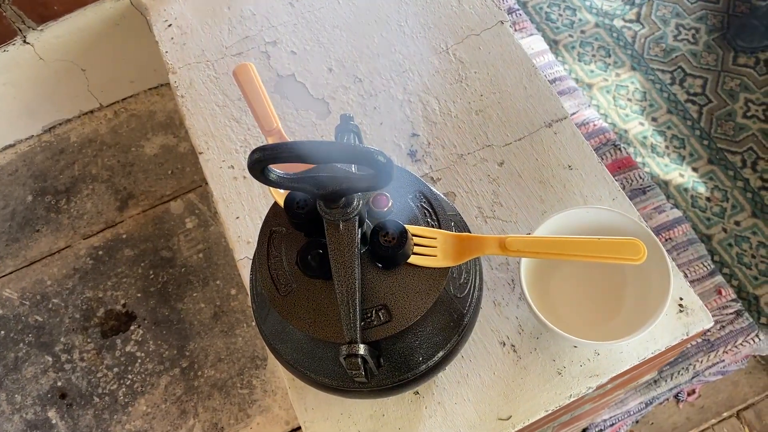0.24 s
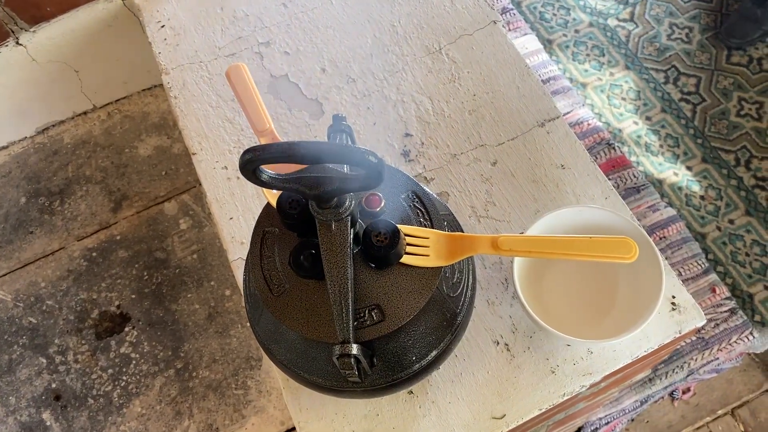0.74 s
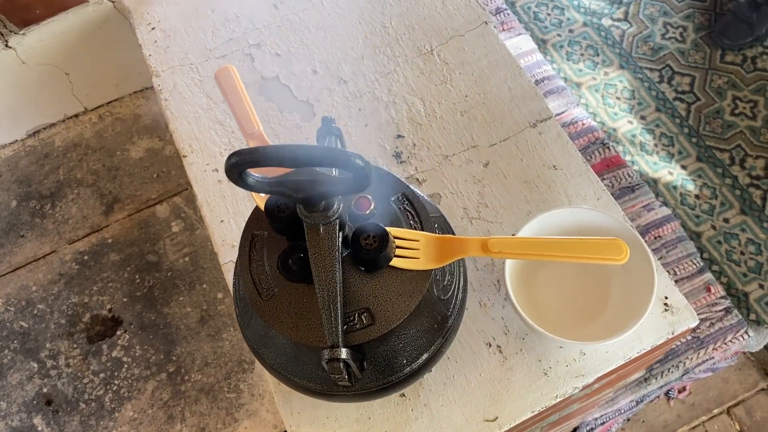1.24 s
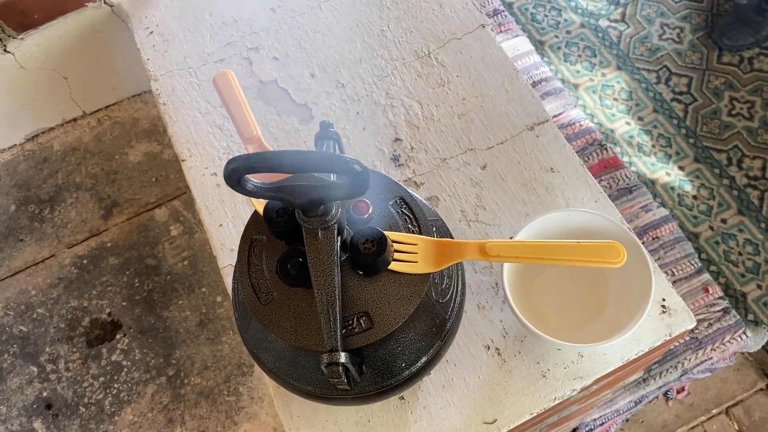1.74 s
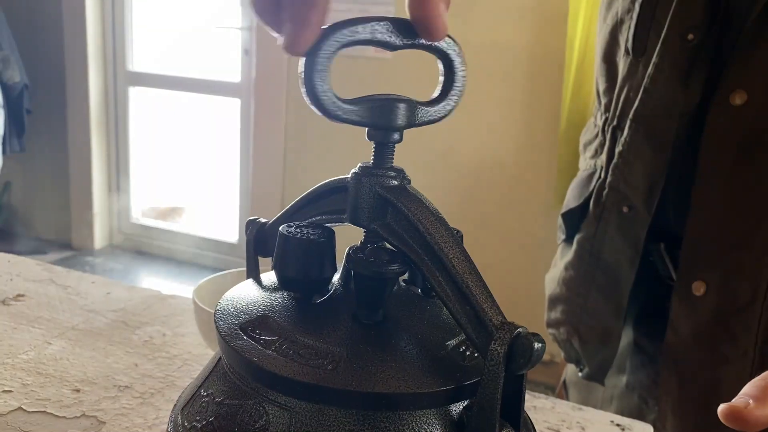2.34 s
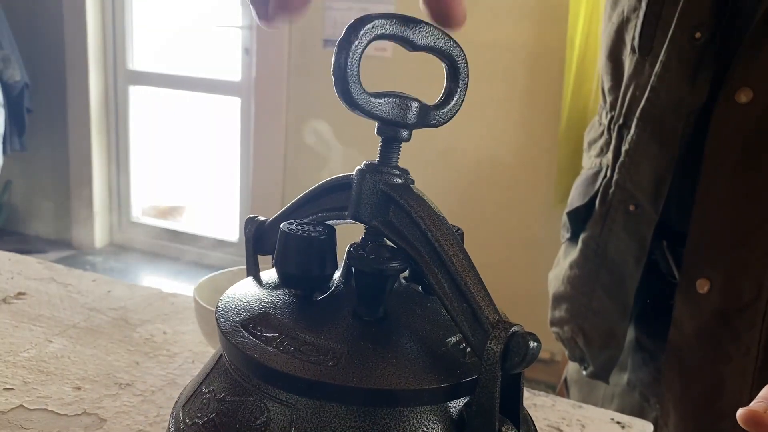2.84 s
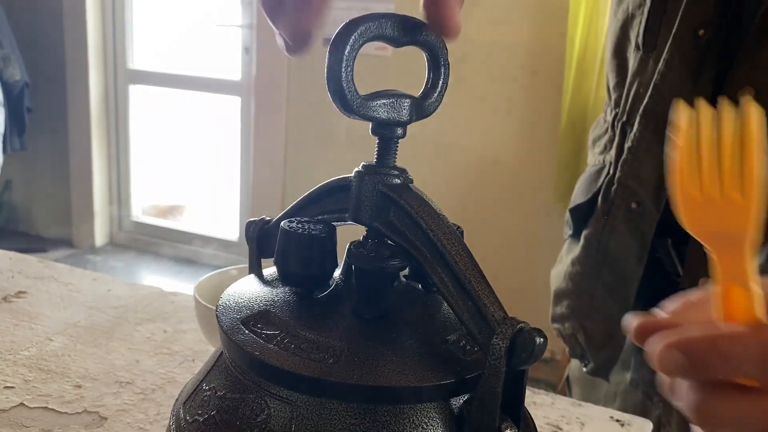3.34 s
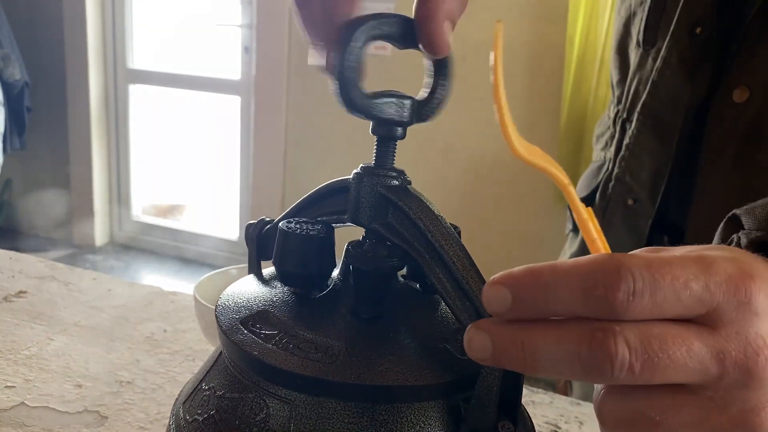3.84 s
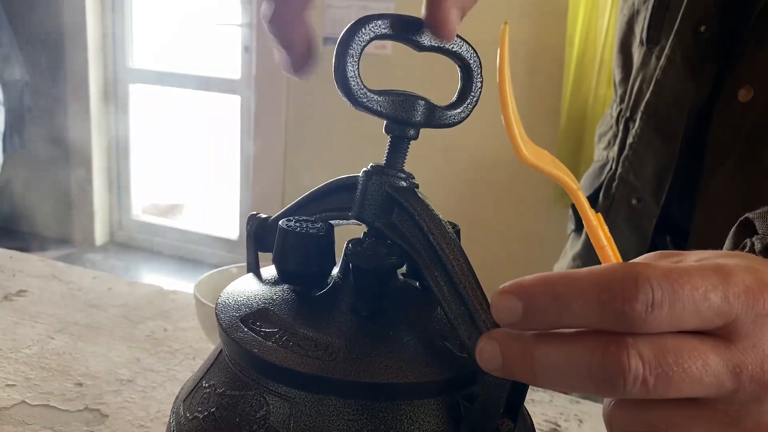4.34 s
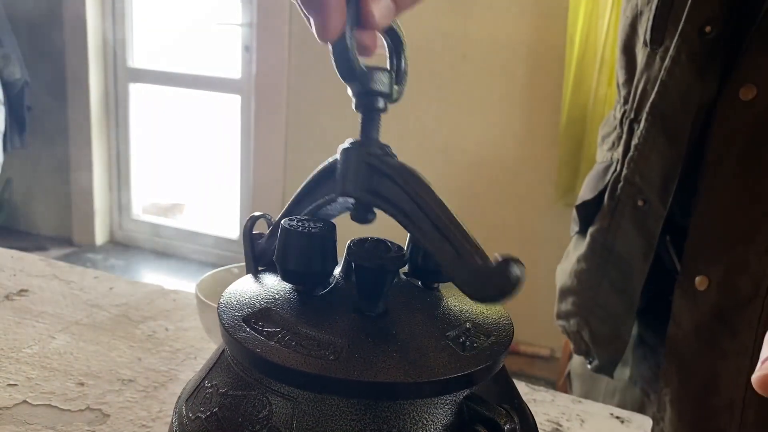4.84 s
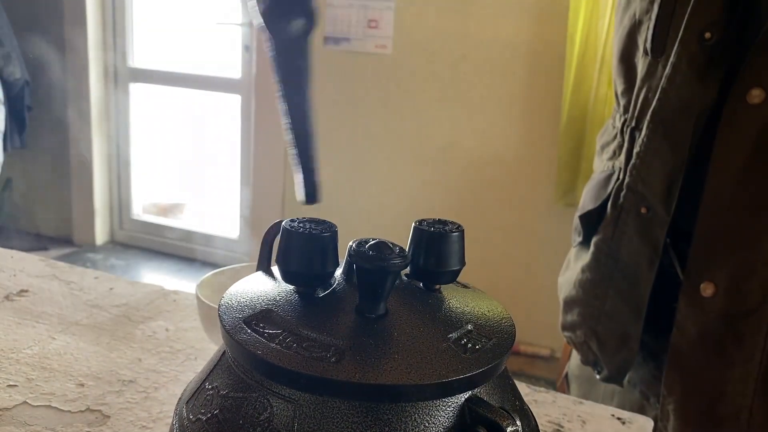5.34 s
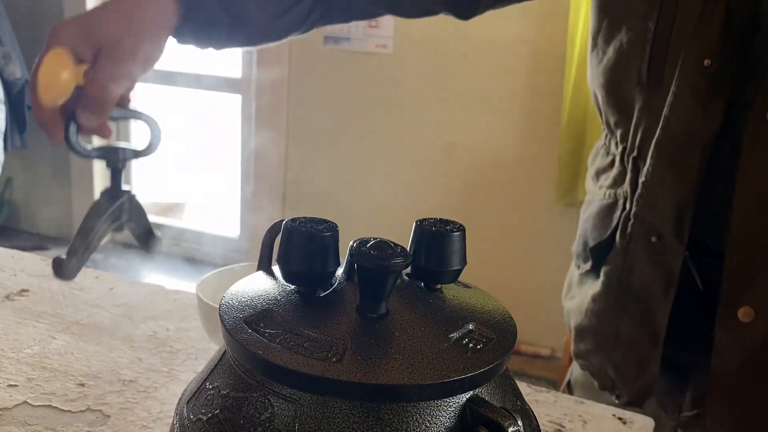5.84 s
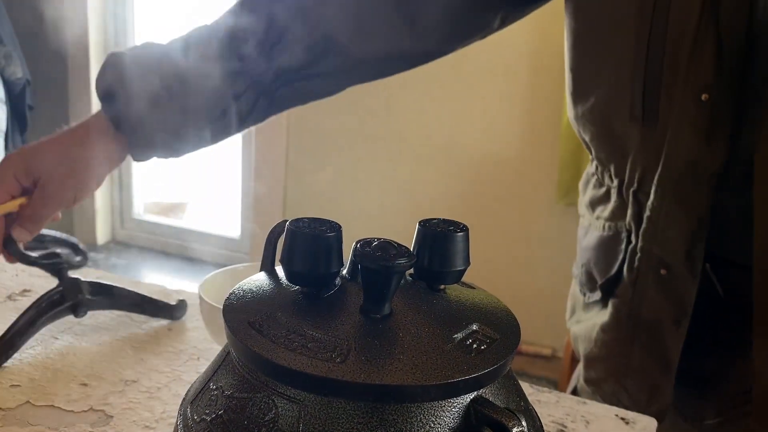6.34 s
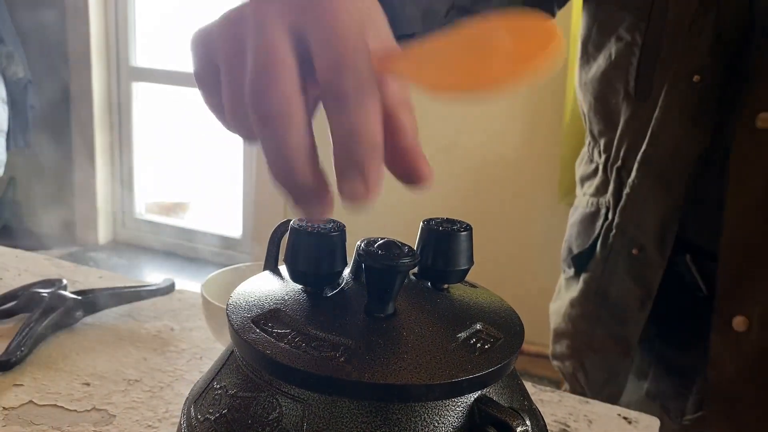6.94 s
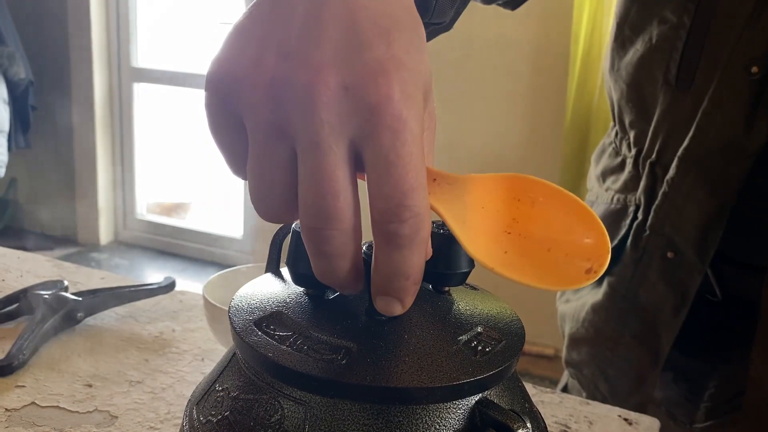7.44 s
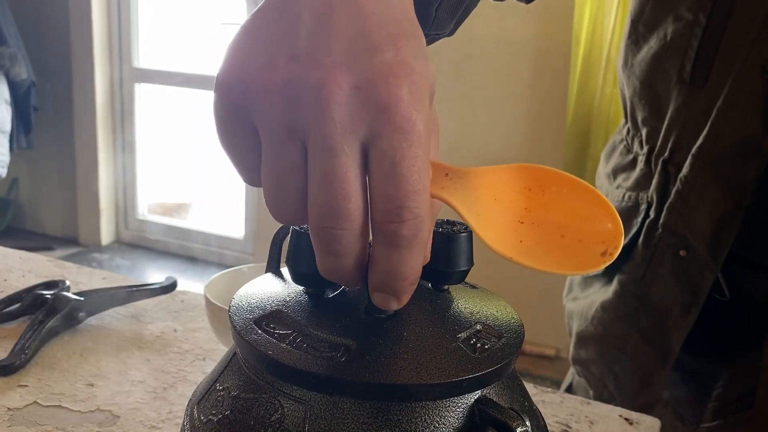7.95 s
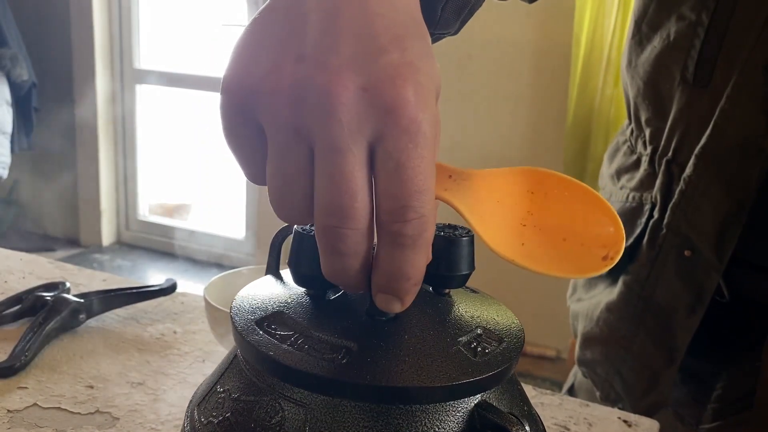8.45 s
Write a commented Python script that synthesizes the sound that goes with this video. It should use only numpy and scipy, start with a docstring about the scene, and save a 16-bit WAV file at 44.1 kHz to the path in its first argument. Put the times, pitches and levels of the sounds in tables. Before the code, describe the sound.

Full-force pressure-cooker hiss, piercing and nearly constant, is chopped off after about two seconds. Soft fading fizz remains, with irregular dull taps, small scrapes and short iron clinks from loosening the cast clamp. The strongest clank comes mid-way, followed by a gentle puff of steam and knocks on the table. A brief spurt and thin squeak from the valve ends it. Small wooden room, close phone microphones, slightly left-heavy metal.

```python
"""A loud, steady steam jet hisses from the propped valve of a cast pressure cooker in a cabin kitchen, then
is cut short. The last steam seeps away as shaped noise on a sinking pressure over a rumbling stove, while the
screw handle is spun loose and the clamp knocks free and is laid on the table: ringing modes, struck, scraped
or rattled. At last a hand presses the valve, which squeaks and whistles. A phone's two microphone ports
listen, the left one hearing the ironwork louder."""
import sys
import numpy as np
from scipy import signal
from scipy.fft import rfft, irfft, next_fast_len
from scipy.io import wavfile
from scipy.ndimage import uniform_filter1d, map_coordinates

SR = 44100
rng = np.random.default_rng(int(sys.argv[2]) if len(sys.argv) > 2 else 0)


def generate_wav(sig):
    """Save sig (samples, or channels by samples) to the path in sys.argv[1] as 16-bit PCM at SR."""
    pcm = np.round(np.clip(np.atleast_2d(sig).T, -1, 1) * 32767).astype(np.int16)
    wavfile.write(sys.argv[1], SR, pcm)


N = 383223
JET_END = 1.9705  # s

# mode of the screw handle: (frequency [Hz], level [dB], decay [share of the contact's t60])
HANDLE_MODES = [(4001, 7, 0.65)]
# modes of the pot, each t60 shortened by the contact: (frequency [Hz], level [dB], full t60 [s])
POT_MODES = [(410, 4, 0.037), (583, 2.5, 0.018), (694, 6, 0.02), (1038, 2, 0.033), (1317, -1, 0.012)]
# modes of the wooden table under the pot: (frequency [Hz], level [dB], full t60 [s])
TABLE_MODES = [(89.8, -6, 0.36), (133.3, -6.5, 0.33), (229.7, -2, 0.072), (600, -14, 0.043)]


def amp(db):
    """Gain of a level in dB."""
    return 10 ** (np.asarray(db) / 20)


def unit(x):
    """x at rms 1."""
    return x / np.sqrt(np.mean(x ** 2) + 1e-20)


def along(points, hz):
    """Every column of (Hz, value, ..) points, read on a log frequency axis."""
    f, *cols = np.transpose(points)
    return np.array([np.interp(np.log(hz + 1), np.log(f + 1), c) for c in cols])


def curves(rows):
    """One value per sample for each column after the time; the end values hold."""
    s, *cols = np.transpose(rows)
    return [np.interp(np.arange(N) / SR, s, c) for c in cols]


def wobble(rate):
    """A smooth random curve, rate knots a second."""
    knots = rng.standard_normal(int(N * rate / SR) + 4)
    return map_coordinates(knots, [np.arange(N) * rate / SR])


def swell(s, length):
    """A smooth rise and fall from s, zero elsewhere."""
    return np.sin(np.pi * np.clip((np.arange(N) / SR - s) / length, 0, 1)) ** 2


def filtered(x, response):
    """x times a complex response of frequency."""
    m = next_fast_len(N + SR // 2)
    return irfft(rfft(x, m) * response(np.fft.rfftfreq(m, 1 / SR)), m)[..., :N]


def ports(pair):
    """Left and right from a shared and an unshared signal; the distance between the ports turns the phase."""
    # likeness of the two microphone ports: (frequency [Hz], correlation [0 to 1])
    alike = [(30, 0.53), (90, 0.94), (250, .75), (500, .5), (1100, 0.39), (3200, 0.59), (5000, 0.11),
             (6200, 0.55), (7000, 1), (8000, 1), (9000, 0.98), (15800, 0.81)]
    # phase by which the left port leads: (frequency [Hz], lead [rad])
    left_lead = [(0, 0), (2400, .4), (3300, 1.3), (4300, .9), (5200, 2.7), (6100, 6), (6900, 2 * np.pi),
                 (15480, -2 * np.pi), (16600, -2 * np.pi)]

    def mix(hz):
        turn = np.arccos(np.clip(along(alike, hz)[0], 0, 1)) / 2
        return np.array([np.cos(turn), np.sin(turn)])

    def lead(hz):
        # half the lead goes to each port, with opposite signs
        return np.exp(.5j * np.outer([1, -1], np.interp(hz, *np.transpose(left_lead))))

    shared, own = filtered(pair, mix)
    return filtered(np.array([shared + own, shared - own]), lead)


def rush(colour, patchy_db):
    """Stereo turbulence of rms 1: coloured noise with patches of random gain in time and frequency."""
    z = signal.stft(rng.standard_normal((2, N)), nperseg=512)[2]
    over_frequency = uniform_filter1d(rng.standard_normal(z.shape[1:]), 6, 0)
    patches = unit(uniform_filter1d(over_frequency, 10, 1))
    pair = signal.istft(z * amp(patchy_db * patches), nperseg=512)[1][:, :N]
    return unit(filtered(ports(pair), lambda hz: amp(along(colour, hz))))


def jet():
    """The full steam jet is broad turbulence that flutters slightly and stops within 0.33 ms."""
    # tone of the jet at each port: (frequency [Hz], left level [dB], right level [dB])
    jet_colour = [(19.8, -60.5, -61.5), (49, -45.5, -47.5), (150, -40.5, -40), (507, -38.5, -42),
                  (1030, -32, -36), (2400, -18, -19.5), (4100, -8, -14.5), (5260, -9.5, -19),
                  (6340, -16.5, -15), (7550, -12.5, -18), (8340, -8, -3), (8570, -13, -16),
                  (10600, -2.5, -2.5), (13900, -1, -1), (17000, -2.5, -2)]
    level_db, extra_hiss_db = -21.5, 1  # level of the jet; extra strength of its hiss under 7.5 kHz
    flow = rush(jet_colour, patchy_db=0.84)
    lower = filtered(flow, lambda hz: 1 / (1 + (hz / 7500) ** 8))
    flow = flow + lower * (amp(extra_hiss_db) - 1)
    on = np.clip((JET_END - np.arange(N) / SR) / 0.00033, 0, 1)
    flutter_db = 0.43 * wobble(12.67) + 0.31 * wobble(150)
    return on * amp(level_db + flutter_db) * flow


def stove():
    """The draught of the stove rumbles in lumps: low noise with a slowly wandering level."""
    # tone of the rumble at each port: (frequency [Hz], left level [dB], right level [dB])
    stove_colour = [(15.26, -48, -37), (30, -17, -27), (45.4, -17, -7), (62.8, 5, -4), (105, -7, -5),
                    (158, -8.5, -17), (215, -26, -24.5), (338, -36, -36.5), (590, -38, -38.5),
                    (3000, -120, -120)]
    level_db, start_s, fade_s = -58, 1.97, 0.32
    fade = np.clip((np.arange(N) / SR - start_s) / fade_s, 0, 1)
    lumps_db = 2.4 * wobble(15) + 2.2 * wobble(9.6) + 0.99 * wobble(2.9)
    rumble = amp(lumps_db) * rush(stove_colour, patchy_db=1.8)
    return fade * amp(level_db) * unit(rumble)


def seep():
    """Dying steam: hiss and fizz at the valve, murmur of the hot liquid in the pot, all on one pressure."""
    # tones at each port: (frequency [Hz], left level [dB], right level [dB])
    hiss_colour = [(1010, -14, -32), (1550, -5, -4.5), (2280, 2.5, -8.5), (3950, 2, -4.5), (4940, 0.5, -4),
                   (5730, 2, 1.5), (7950, -2, -4), (8200, -37, -12), (10600, -22, -29), (15000, -120, -120)]
    fizz_colour = [(6470, -48, -11), (8000, -1, -2.5), (11060, -1, -0.5), (13900, -2, -2.5),
                   (16100, -8, -6)]
    murmur_colour = [(150, 0, -3.5), (338, -2, -8), (535, -3, -10.5), (790, 3, -8.5), (1082, -0.5, -2.5),
                     (1630, 1.5, -18), (2350, -26, -32), (8000, -120, -120)]
    # flow at the valve under the hand, pressed, shut, let go: (time [s], hiss level [dB], fizz level [dB])
    hand = [(7.8, -2.5, -0.5), (8.04, 1.5, 3), (8.07, 2, -3), (8.24, -2, -8), (8.265, -7, -12),
            (8.305, -8, -15.5), (8.335, 11, 2.5), (8.51, 1, -2.5), (8.535, -2, -5)]
    start_db, sink_db_per_s = -55, 2.5
    surge_start_db, surge_s = 17.5, 0.15
    fizz_db, murmur_db = -1, -8  # against the hiss
    lift_s, lift_db, rise_s, fall_s = 4.6, 5.5, 0.19, 0.24  # the freed lid lets out a puff

    t = np.arange(N) / SR
    after = np.maximum(t - JET_END, 0)
    surge_db = surge_start_db * np.exp(-after / surge_s)
    flow_db = start_db - sink_db_per_s * after
    from_lift = np.where(t < lift_s, (lift_s - t) / rise_s, (t - lift_s) / fall_s)
    puff_db = lift_db * np.exp(-from_lift ** 2)
    hiss_hand_db, fizz_hand_db = curves(hand)

    # the lower hiss takes a smaller share of the puff
    hiss_level_db = flow_db + surge_db + 0.77 * puff_db + hiss_hand_db + 0.34 * wobble(3.17)
    fizz_level_db = flow_db + surge_db + puff_db + fizz_hand_db + fizz_db + wobble(2.91)
    murmur_level_db = flow_db + 0.89 * surge_db + murmur_db + 0.75 * wobble(20)
    hiss = amp(hiss_level_db) * rush(hiss_colour, patchy_db=1.5)
    fizz = amp(fizz_level_db) * rush(fizz_colour, patchy_db=1.7)
    murmur = amp(murmur_level_db) * rush(murmur_colour, patchy_db=1.5)
    return hiss + fizz + murmur


def ring(modes, t, scatter_db, free=1, centre_hz=1, narrow_db=0):
    """One blow: every mode at a new strength, weaker away from the centre that the struck spot favours."""
    hz, db, t60 = np.transpose(modes)[:, :, None]
    db = db + scatter_db * rng.standard_normal(db.shape)
    db = db - narrow_db * np.log2(hz / centre_hz) ** 2
    decay_db = 60 * t / (t60 * max(free, .01))
    return (amp(db - decay_db) * np.sin(2 * np.pi * hz * t)).sum(0)


def contacts():
    """Clanks, rattles and taps as rows of the same shares, with levels at the source."""
    # clamp and screw clank: (time [s], clamp level [dB], where it rings most [Hz],
    # narrowness [dB at one octave], handle level [dB], pot level [dB], where the pot rings most [Hz],
    # table level [dB])
    clanks = [(2.006, -42, 6620, 15, -65, -62, 848, -45), (2.393, -37, 4030, 13.5, -50, -55, 960, -49),
              (2.5755, -39, 4150, 10, -54, -49.5, 355, -59), (2.6851, -33, 2920, 6, -52, -41.5, 415, -64),
              (3.124, -41, 4096, 14, -45, -51, 1050, -56), (3.1922, -44.5, 4000, 4, -55, -43, 442, -55),
              (4.035, -45.5, 3500, 5.5, -62, -53, 374, -53),
              (4.0871, -33.5, 3696, 29, -43.5, -50.5, 1050, -52.5),
              (4.209, -41, 2720, 6.5, -74, -50, 1080, -58), (4.3186, -48, 2720, 12, -77, -43.5, 1050, -57),
              (4.5052, -21.5, 1460, 26, -35, -33, 686, -40.5),
              (4.5114, -23, 6360, 11, -68, -40, 425, -41.5), (4.855, -33, 1590, 18, -53, -44.5, 735, -46),
              (5.0982, -43, 1630, 10, -75, -57, 1100, -49), (5.215, -37, 2900, 2, -50, -58, 704, -63),
              (5.228, -34.5, 5360, 16, -64, -56, 1060, -65), (6.097, -33, 4150, 24, -48, -59, 494, -53.5),
              (6.271, -31.5, 3900, 16, -50, -70, 382, -46), (6.4472, -40, 3520, 15, -58, -42, 570, -38.5),
              (6.7377, -43, 1530, 7, -61, -60, 396, -50.5), (6.7564, -37.5, 2870, 17, -65, -60, 363, -46),
              (6.7787, -42.5, 5650, 6, -53, -76, 301, -46)]
    # the loose handle rattles on its screw: (time [s], handle level [dB])
    rattle_times = [(4.0916, -44.5), (4.1295, -45.5), (4.1497, -48), (4.1857, -51), (4.551, -52),
                    (4.83, -55), (5.0676, -59)]
    # dull taps on the pot: (time [s], pot level [dB], where it rings most [Hz])
    tap_times = [(2.964, -54, 1080), (3.082, -49.5, 650), (3.1143, -49, 785), (3.4109, -50.5, 390),
                 (3.4786, -59, 756), (3.841, -58, 900), (4.2664, -43.5, 647), (4.4703, -45.5, 1060),
                 (4.621, -53.5, 490), (4.6409, -47, 1070), (4.774, -46, 660), (5.038, -51.5, 1080),
                 (5.0675, -51, 1080)]
    handle_hz = HANDLE_MODES[0][0]
    rattles = [(s, db + 1.5, handle_hz, 18, db, db - 7.5, 900, db - 7.5) for s, db in rattle_times]
    taps = [(s, db - 5, 4000, 6, -120, db, hz, db - 4) for s, db, hz in tap_times]
    return clanks + rattles + taps


def knocks():
    """Each contact cracks and rings clamp, handle, pot and table in its own shares."""
    # modes of the iron clamp, each t60 shortened by the contact: (frequency [Hz], level [dB], full t60 [s])
    clamp_modes = [(1576, -2.5, 0.02), (2550, -19, 0.042), (2795, -8.5, 0.025), (3560, -17.5, 0.044),
                   (4480, -5.5, 0.02), (4855, -13, 0.062), (5440, 4.5, 0.022), (5940, -17, 0.03),
                   (6440, -12, 0.083), (7590, -7.5, 0.11), (8490, -5, 0.1), (9100, -25, .05),
                   (10140, -37, 0.035)]
    scatter_db, handle_t60 = 2.5, 0.049  # t60 [s] of a contact on the held handle
    out, t = np.zeros(N + SR), np.arange(SR // 2) / SR
    for s, clamp_db, clamp_hz, narrow_db, handle_db, pot_db, pot_hz, table_db in contacts():
        band = signal.butter(1, [clamp_hz / 1.7, min(clamp_hz * 1.36, 11000)], "band", fs=SR)
        crack = 1.43 * amp(-60 * t / 0.009) * signal.lfilter(*band, rng.standard_normal(len(t)))
        # rough cast faces chatter for some milliseconds, which smears the ring
        chatter = amp(-60 * t[:SR // 30] / 0.03) * rng.standard_normal(SR // 30) ** 3
        clamp = ring(clamp_modes, t, scatter_db, 0.37, clamp_hz, narrow_db)
        iron = signal.fftconvolve(clamp, chatter / np.linalg.norm(chatter))[:len(t)]
        handle = ring(HANDLE_MODES, t, scatter_db / 2, handle_t60)
        pot = ring(POT_MODES, t, scatter_db, 0.81, pot_hz, narrow_db=11.0)
        table = ring(TABLE_MODES, t, scatter_db)

        blow = amp(clamp_db) * (iron + crack)
        blow += amp(handle_db) * handle
        # pot and table answer more softly than the iron
        blow += amp(pot_db) * pot * (1 - np.exp(-t / 0.0013))
        blow += amp(table_db) * table * (1 - np.exp(-t / 0.0028))
        out[round(s * SR):][:len(t)] += blow * (1 - np.exp(-t / 0.00051))
    return out[:N]


def cabin(x):
    """Two diffuse tails of the wooden room, drawn afresh every quarter second; highs and lows die apart."""
    # decay of the room: (frequency [Hz], t60 [s])
    room_decay = [(200, 0.27), (2000, 0.39), (10000, 0.05)]
    out, step = np.zeros((2, N + 2 * SR)), SR // 4
    for start in range(0, N, step):
        hz, t, z = signal.stft(rng.standard_normal((2, SR // 3)), SR, nperseg=256)
        t60 = along(room_decay, hz)[0][:, None]
        tail = signal.istft(z * amp(-60 * t / t60), SR, nperseg=256)[1]
        wet = signal.fftconvolve(x[None, start:start + step], tail / np.linalg.norm(tail[0]), axes=1)
        # the room answers 200 samples late
        out[:, start + 200:][:, :wet.shape[1]] += wet
    return out[:, :N]


def scrapes():
    """Iron drags over the lid: uneven grains of friction stir the modes of pot and table."""
    # strokes, levels at the source: (time [s], length [s], level [dB])
    strokes = [(3.052, 0.22, -62), (3.39, 0.11, -62.5), (3.72, 0.17, -70.5), (4.452, 0.057, -55.5),
               (4.546, .14, -61.5), (5.028, 0.099, -60)]
    grains_per_s, spread_db = 400, 4
    struck = rng.random(N) < grains_per_s / SR
    grains = struck * amp(spread_db * rng.standard_normal(N)) * rng.choice([-1, 1], N)
    stroke = sum(amp(db) * np.sqrt(swell(s, length)) for s, length, db in strokes)
    t = np.arange(SR // 4) / SR
    pot = ring(POT_MODES, t, 0, 0.78, 900, narrow_db=1)
    body = pot + amp(1) * ring(TABLE_MODES, t, 0, 0.36)
    return signal.fftconvolve(stroke * unit(grains), body / np.linalg.norm(body))[:N]


def pings():
    """Single modes of clamp and handle ping out, some short, some ringing on."""
    # single modes, levels at the source: (time [s], frequency [Hz], level [dB], t60 [s])
    single_modes = [(3.124, 7300, -50, 0.29), (3.13, 4010, -52, .35), (4.091, 2770, -38, .03),
                    (4.506, 1576, -31, 0.034), (4.733, 2400, -53, 0.035), (4.856, 4740, -41, 0.044),
                    (5.229, 4720, -38, 0.052), (5.232, 4000, -63.5, 1.26), (6.097, 2470, -53, 0.1),
                    (6.645, 7300, -69.5, 0.55), (6.762, 2786, -42, 0.065), (6.79, 4030, -65, .3),
                    (6.78, 6060, -48, 0.075), (7.048, 7300, -70, .25), (7.175, 4640, -61, 0.061),
                    (7.24, 4700, -64.5, .08)]
    out, t = np.zeros(N + SR), np.arange(SR // 2) / SR
    for s, *mode in single_modes:
        out[round(s * SR):][:len(t)] += ring([mode], t, 1) * (1 - np.exp(-t / 0.00085))
    return out[:N]


def valve():
    """Wavering edge tones of the valve under the hand, and a rising squeak with its octave as the gap opens."""
    # edge tones, levels at the source: (time [s], length [s], mean frequency [Hz], mean level [dB])
    whistles = [(8.07, .17, 3450, -78), (8.33, 0.15, 3920, -74), (8.334, .12, 6600, -72),
                (8.43, .11, 4440, -70), (8.44, .09, 5960, -64), (8.44, 0.097, 6400, -68),
                (8.54, 0.2, 4470, -77)]
    squeak_s, length_s, squeak_db = 8.303, 0.029, -63
    start_hz, rise_hz_per_s = 1850, 50000
    t = np.arange(N) / SR - squeak_s
    turn = 2 * np.pi * (start_hz + rise_hz_per_s * t / 2) * t
    out = amp(squeak_db) * swell(squeak_s, length_s) * (np.sin(turn) + 0.4 * np.sin(2 * turn))
    for s, length, hz, db in whistles:
        wavering = hz * (1 + .016 * wobble(150) + .012 * wobble(25))
        tone = np.sin(2 * np.pi * np.cumsum(wavering) / SR)
        out += amp(db + 4 * wobble(110)) * np.sqrt(swell(s, length)) * tone
    return out


def scene():
    """The jet first, then the quiet kitchen fades in with its close ironwork and short room."""
    near = knocks() + scrapes() + valve()
    single = pings()
    # pings stay close and nearly dry; the direct sound is louder at the left port
    direct = (near + single) * amp([[.3], [-6]])
    heard = ports(amp(-13) * cabin(near + 0.34 * single) + direct)
    # tone of the ironwork at the microphone: (frequency [Hz], left level [dB], right level [dB])
    tone = [(100, 3.6, 1.0), (3220, 5.1, 3.6), (6800, 0.15, 2.6)]
    heard = filtered(heard, lambda hz: amp(along(tone, hz)))
    fade = np.clip((np.arange(N) / SR - JET_END) / 0.024, 0, 1)
    return jet() + stove() + fade * seep() + heard


def record(dry):
    """The phone keeps nothing above its band limit, a smooth edge 120 Hz wide."""
    top_hz = 15750
    return filtered(dry, lambda hz: np.cos(np.pi / 2 * np.clip((hz - top_hz) / 120 + .5, 0, 1)) ** 2)


dry = scene()
out = record(dry)
generate_wav(out)
```